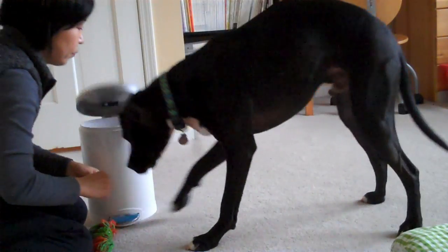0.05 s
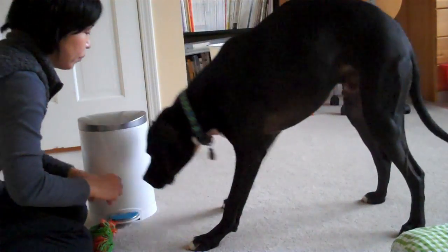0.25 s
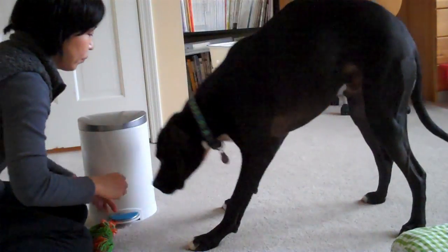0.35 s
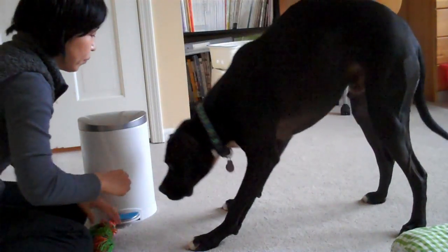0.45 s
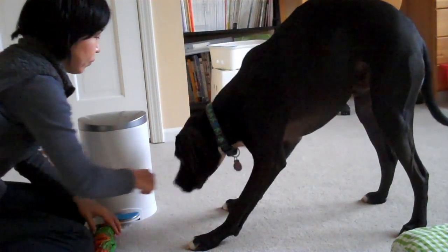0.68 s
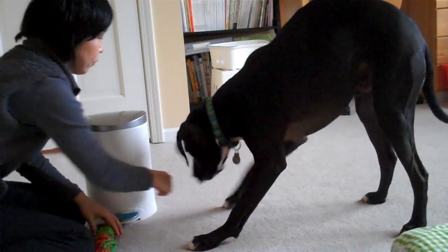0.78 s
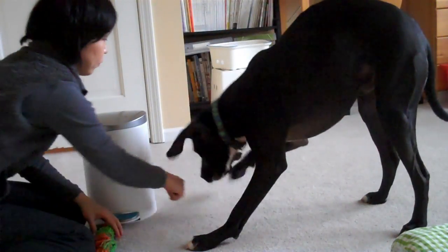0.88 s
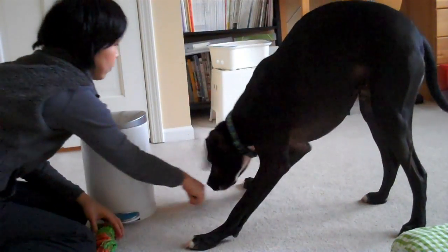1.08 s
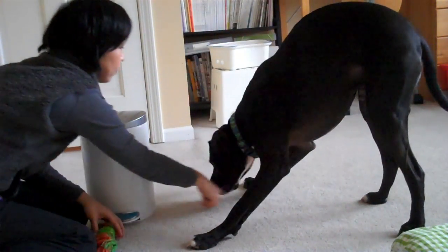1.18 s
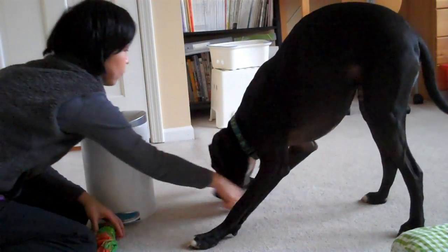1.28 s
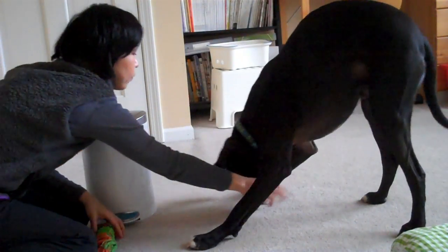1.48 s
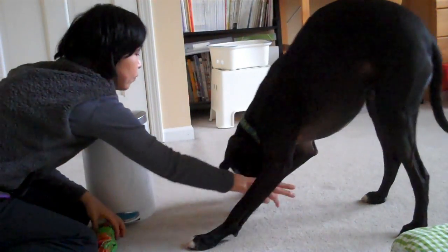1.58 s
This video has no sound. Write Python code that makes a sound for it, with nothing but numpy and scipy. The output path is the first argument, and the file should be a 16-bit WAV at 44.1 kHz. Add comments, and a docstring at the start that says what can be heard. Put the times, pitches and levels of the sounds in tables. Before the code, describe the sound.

The metal lid of a pedal bin bangs shut near the microphone indoors, just after a light pedal knock. As the ring fades, a sleeve and paws rustle faintly on carpet, the floor thuds softly and a collar tag ticks.

```python
"""A pedal knocks free, then the steel lid of a bin drops, grazes the rim and bangs shut, close by in a
carpeted room. Lid and can ring on. A sleeve and paws brush over the carpet, weight thuds softly on the
floor and a dog's collar tag ticks a few times. Heard in stereo through two small microphone ports,
each with its own treble resonance, over a faint hiss."""
import sys
import numpy as np
from scipy import signal
from scipy.fft import rfft, irfft, next_fast_len
from scipy.io import wavfile

SR = 44100
rng = np.random.default_rng(int(sys.argv[2]) if len(sys.argv) > 2 else 0)


def persist_wave(psi):
    """Save psi, clipped to +-1, as 16-bit WAV."""
    counts = np.round(np.clip(psi, -1, 1) * 32767).astype(np.int16)
    wavfile.write(sys.argv[1], SR, np.atleast_2d(counts).T)


N = 72765
T = np.arange(N) / SR

# Levels are relative; a spectrum gives the level per hertz.
# lid meeting the rim (t/s, level/dB, contact time/ms)
LID_BLOWS = [(0.2058, -15, .08), (0.2121, -1.5, 0.021), (0.2166, -8, .06), (0.2245, -8.5, .05),
             (0.2367, -10, 0.19), (0.2471, -5.5, 0.25)]
# ringing of the lid (f/Hz, level/dB, t60/s)
LID_MODES = [(609.7, -26.5, 0.25), (634, -33, 0.22), (716, -30, 0.18), (788, -42, 0.74), (809, -38, .42),
             (967, -32.5, .25), (1010, -27, .24), (1027, -37, 0.43), (1162, -27.5, 0.27),
             (1227, -18.5, 0.26), (1253.7, -25.5, 0.31), (1423, -30, 0.16), (1591, -28.5, 0.26),
             (1700, -24, 0.26), (1680, -46.5, 0.9), (1857, -33.5, 0.23), (2073, -34.5, 0.46),
             (2220, -36, 0.46), (2316, -36, 0.51), (2375, -39, .6), (2405, -40.5, .58), (2630, -39, 0.45),
             (2690, -50.5, 1), (2894, -50, 1.1), (3009, -49, 0.83)]
SHUT_S, LID_RISE_S = .2112, .0066  # full weight lands; rise at the clang's pitch, slower above it
CLANG_HZ, CLANG_DB, CLANG_T60_S, CLANG_RISE_S = 1246, -10.5, .061, .005  # first swing, damped by the rim
PUFF_S, PUFF_DB, PUFF_WIDTH_S = .18, -33.5, .00054
# ringing of the rim (f/Hz, level/dB, t60/s)
RIM_MODES = [(5797, -46.5, .32), (5870, -38.5, 0.28), (5898, -26, .03), (6730, -41.5, .22),
             (7330, -45, 0.17)]
TING_S, TING_RISE_S = .2238, .0004  # steel edge snaps onto the steel rim
# air and walls of the closed can (f/Hz, level/dB, t60/s)
CAN_MODES = [(96, -34, 0.15), (193, -34, 0.14), (243.6, -37.5, 0.36), (354, -36.5, 0.22), (461, -37, 0.25)]
# soft second swell of the lid's 1.2 kHz ring (f/Hz, level/dB, t60/s)
SWELL_MODES = [(1233, -35.5, 0.21)]
SWELL_S, SWELL_RISE_S = .398, .023
# spectrum and decay of the dense modes of can and liner (f/Hz, level/dB, t60/s)
SHELL_BANDS = [(40, -12.5, 0.23), (100, -19.5, .17), (203, -7.5, 0.22), (399, -6.5, 0.38),
               (700, -5.5, 0.425), (1200, -3.5, 0.46), (1900, -2.5, 0.33), (2420, -16.5, 0.74),
               (3070, -16.5, 0.57), (4500, -10, 0.36), (8030, -8, 0.24), (14000, -18.5, 0.25)]
SHELL_DB, CRACK_DB, CRACK_T60_S = -22, -28.5, .06

# ringing of the pedal rod and the open lid (f/Hz, level/dB, t60/s)
PEDAL_MODES = [(283, -54, .25), (348, -45, 0.27), (401, -49, 0.21), (613, -58, .3), (733, -52.5, 0.18),
               (941.4, -59, .3), (1181, -50.5, .25), (1392, -59, 0.15)]
PEDAL_S, PEDAL_RISE_S = .121, .012
# light contacts of linkage and rim (t/s, level/dB, t60/s)
TICKS = [(0.118, -51.5, 0.25), (0.183, -57, 0.3), (0.194, -51, 0.23), (0.202, -33.5, 0.2)]
# spectrum of metal striking metal (f/Hz, level/dB)
METAL_SPECTRUM = [(200, -5.5), (900, 3.5), (2000, -1), (4000, 2), (8000, -2), (14000, -13.5)]

# weight shifting on the floor (t/s, boom level/dB, scuff level/dB, scuff t60/s)
THUDS = [(1.024, -51, -55, 0.32), (1.136, -58.5, -90, .2), (1.604, -78, -54, 0.083)]
# spectrum of the floor's boom (f/Hz, level/dB)
BOOM_SPECTRUM = [(20, -13), (45, 4), (80, -14.5), (140, -25), (400, -49)]
# spectrum of a scuff on carpet (f/Hz, level/dB)
SCUFF_SPECTRUM = [(60, -48), (220, -8), (430, -5.5), (800, -18.5), (1600, -18.5), (4000, -24)]
BOOM_RISE_S, BOOM_T60_S, SCUFF_RISE_S, SCUFF_LEAD_S = .011, .42, .007, .0073

# clinks of the collar tag (t/s, click level/dB, ring level/dB)
CLINKS = [(1.0467, -54, -52.5), (1.068, -60, -60), (1.4612, -45, -60), (1.636, -55, -59)]
# spectrum of the tag's click (f/Hz, level/dB)
CLICK_SPECTRUM = [(2000, -18), (6000, -3), (14000, -2)]
# ringing of the tag (f/Hz, level/dB, t60/s)
TAG_MODES = [(5900, -8, 0.065), (7400, 0.5, 0.06), (7570, 1.5, 0.056)]

# course of the brushing over the carpet (t/s, level/dB)
BRUSH_LEVELS = [(0, -62.5), (.09, -70), (.55, -66.5), (.68, -62), (.85, -57), (.95, -56.5), (1.02, -59.5),
                (1.18, -60), (1.35, -57), (1.5, -58), (1.6, -63), (1.65, -60.5)]
# spectrum of the brushing (f/Hz, level/dB)
BRUSH_SPECTRUM = [(100, -6), (400, -5.5), (1200, -1), (3000, 5.5), (6000, 7), (9000, 7), (14000, -7)]
# wide stereo image of the brushing (f/Hz, left-right correlation)
BRUSH_LIKENESS = [(200, 0.55), (2000, 0.54), (4000, 0.3), (6000, -.1)]
FIBRES_PER_S, FIBRE_DB, BRUSH_FLUTTER_DB = 900, -9.5, .54

# stereo image of bin, tag, floor and room (f/Hz, left-right correlation)
LIKENESS = [(30, 0.89), (200, 0.99), (650, 0.95), (1200, 0.85), (2200, 0.47), (4000, 0.19), (6000, 0.067)]
ROOM_DB, ROOM_T60_S = -15, .58
# response of the microphone ports (f/Hz, left level/dB, right level/dB)
PORT_RESPONSE = [(30, -5.5, 3.5), (130, 2.5, 4.5), (2002, 3.5, 2.5), (4000, 1, 1), (5160, 5, 6),
                 (6050, 4.5, 14), (6600, 10.5, 1), (7264, 12.5, 2), (8270, 4, -9.5), (10000, -3.5, -16),
                 (14000, -11.5, -27.5)]
# spectrum of the microphones' self-noise (f/Hz, level/dB)
HISS_SPECTRUM = [(20, 4), (60, -0.5), (300, -1.5), (700, -2), (2000, -5.5), (6000, -9), (14000, -13)]
# balance of that self-noise (f/Hz, left minus right level/dB)
HISS_BALANCE = [(40, -3.5), (200, 5), (900, 6.5), (2500, 2), (5000, 0)]
HISS_DB, TOP_HZ = -59.5, 14250


def lid():
    """Close by, the lid pushes out a puff of air, hits the rim and chatters; its ring swells once more."""
    force = np.zeros(N)
    for start, db, ms in LID_BLOWS:
        push = np.exp(-T / (ms / 1000))
        at = int(start * SR)
        force[at:] += undb(db) * (push / push.sum())[:N - at]
    puff = undb(PUFF_DB) * np.exp(-.5 * ((T - PUFF_S) / PUFF_WIDTH_S) ** 2)
    clang = ring([(CLANG_HZ, CLANG_DB, CLANG_T60_S)], SHUT_S, CLANG_RISE_S)
    dome = sum(ring([(hz, db, t60)], SHUT_S, LID_RISE_S * (hz / CLANG_HZ) ** 2)
               for hz, db, t60 in LID_MODES)
    rim = ring(RIM_MODES, TING_S, TING_RISE_S)
    can = ring(CAN_MODES, SHUT_S, rise=.002)
    swell = ring(SWELL_MODES, SWELL_S, SWELL_RISE_S)
    return convolve(force, shell()) + room(puff + clang + dome + rim + can + swell)


def shell():
    """The bin answers one blow with a crack, then dense modes that fade band by band."""
    dense = noise(SHELL_BANDS)
    centres = np.geomspace(40, 14000, num=18)
    out = undb(CRACK_DB) * noise(METAL_SPECTRUM) * fade(0, CRACK_T60_S)
    for hz, share in zip(centres, np.eye(len(centres))):
        band = tint(dense, lambda f: np.interp(f, centres, share))
        out += undb(SHELL_DB) * band * fade(0, t60=over_hz(hz, SHELL_BANDS, column=2))
    return out


def pedal():
    """At the foot of the bin, the released pedal knocks its rod against the can."""
    return room(ring(PEDAL_MODES, PEDAL_S, PEDAL_RISE_S))


def metal_ticks():
    """The linkage ticks and the lid grazes the rim just ahead of the bang."""
    return noise(METAL_SPECTRUM) * sum(undb(db) * fade(start, t60) for start, db, t60 in TICKS)


def floor_thuds():
    """Weight lands on the carpet: a dull scuff, then a boom of the floor."""
    boom = sum(undb(db) * fade(start, BOOM_T60_S, BOOM_RISE_S) for start, db, _, _ in THUDS)
    scuff = sum(undb(db) * fade(start - SCUFF_LEAD_S, t60, SCUFF_RISE_S) for start, _, db, t60 in THUDS)
    return boom * noise(BOOM_SPECTRUM) + scuff * noise(SCUFF_SPECTRUM)


def collar_tag():
    """The dog's tag meets the collar ring: a bright click, then a short ringing in the room."""
    clicks = noise(CLICK_SPECTRUM) * sum(undb(db) * fade(start, t60=.018) for start, db, _ in CLINKS)
    ringing = sum(undb(db) * ring(TAG_MODES, start, rise=.00044) for start, _, db in CLINKS)
    return room(clicks + ringing)


def brushing():
    """Sleeve and paws slide under uneven pressure, faint and wide: a hiss with fibres snapping free."""
    snaps = (rng.random((2, N)) < FIBRES_PER_S / SR) * rng.standard_normal((2, N))
    fibres = unit(tint(spread(*snaps, BRUSH_LIKENESS), lambda f: undb(over_hz(f, BRUSH_SPECTRUM))))
    flutter = unit(tint(rng.standard_normal(N), lambda f: np.exp(-f / 35)))
    pressure = undb(np.interp(T, *np.array(BRUSH_LEVELS).T) + BRUSH_FLUTTER_DB * flutter)
    return (noise(BRUSH_SPECTRUM, BRUSH_LIKENESS) + undb(FIBRE_DB) * fibres) * pressure


def room(x):
    """Direct sound reaches the microphones first, then the short diffuse tail of the carpeted room."""
    tail = spread(*rng.standard_normal((2, N))) * fade(.006, ROOM_T60_S, rise=.0035)
    return x + undb(ROOM_DB) * convolve(x, unit(tail) / np.sqrt(N))


def ring(modes, start, rise):
    """Decaying modes set off together; treble modes differ most in phase between the two ports."""
    out = 0
    for hz, db, t60 in modes:
        skew = np.arccos(np.clip(over_hz(hz, LIKENESS), -1, 1)) / 2 * np.array([[1], [-1]])
        out = out + undb(db) * np.sin(2 * np.pi * hz * (T - start) + skew) * fade(start, t60, rise)
    return out


def fade(start, t60, rise=1 / SR):
    """Quick rise and exponential decay, all times in seconds."""
    age = np.maximum(T - start, 0)
    return (1 - np.exp(-age / rise)) * np.exp(-np.log(1000) * age / t60)


def noise(spectrum, likeness=LIKENESS):
    """Diffuse stereo noise of a given spectrum, rms 1."""
    white = spread(*rng.standard_normal((2, N)), likeness)
    return unit(tint(white, lambda f: undb(over_hz(f, spectrum))))


def spread(mid, side, likeness=LIKENESS):
    """Two unrelated signals become a diffuse field: alike at both ports in the bass, not in the treble."""
    correlation = lambda f: np.clip(over_hz(f, likeness), -1, 1)
    common = tint(mid, lambda f: np.sqrt(1 + correlation(f)))
    opposed = tint(side, lambda f: np.sqrt(1 - correlation(f)))
    return np.array([common + opposed, common - opposed])


def convolve(x, response):
    """Play a signal through a stereo response."""
    return signal.fftconvolve(np.atleast_2d(x), response, axes=1)[:, :N]


def tint(x, gain):
    """Filter by a gain that is a function of frequency."""
    size = next_fast_len(2 * N)
    return irfft(rfft(x, size) * gain(np.fft.rfftfreq(size, 1 / SR)), size)[..., :N]


def over_hz(hz, table, column=1):
    """Read a column of a table on a log-frequency axis."""
    rows = np.array(table, float)
    return np.interp(np.log(np.maximum(hz, 1)), np.log(rows[:, 0]), rows[:, column])


def undb(db):
    """Decibels to gain."""
    return 10 ** (np.asarray(db) / 20)


def unit(x):
    """Scale to rms 1."""
    return x / np.sqrt(np.mean(x ** 2))


def scene():
    """The bin and the movement on the carpet, as they arrive at the microphones."""
    return pedal() + lid() + metal_ticks() + collar_tag() + floor_thuds() + brushing()


def record(dry):
    """Two small microphones: each port rings in the treble, each adds faint hiss; the top is cut."""
    left = tint(dry[0], lambda f: undb(over_hz(f, PORT_RESPONSE, column=1)))
    right = tint(dry[1], lambda f: undb(over_hz(f, PORT_RESPONSE, column=2)))
    balance_db = lambda f: np.array([[.5], [-.5]]) * over_hz(f, HISS_BALANCE)
    hiss = tint(rng.standard_normal((2, N)), lambda f: undb(over_hz(f, HISS_SPECTRUM) + balance_db(f)))
    lowpass = signal.ellip(14, .2, 90, TOP_HZ, fs=SR, output="sos")
    return signal.sosfilt(lowpass, np.array([left, right]) + unit(hiss) * undb(HISS_DB))


dry = scene()
out = record(dry)
persist_wave(out)
```